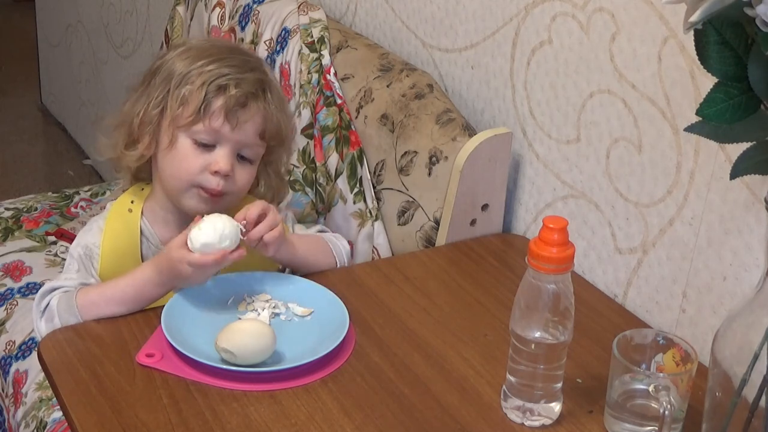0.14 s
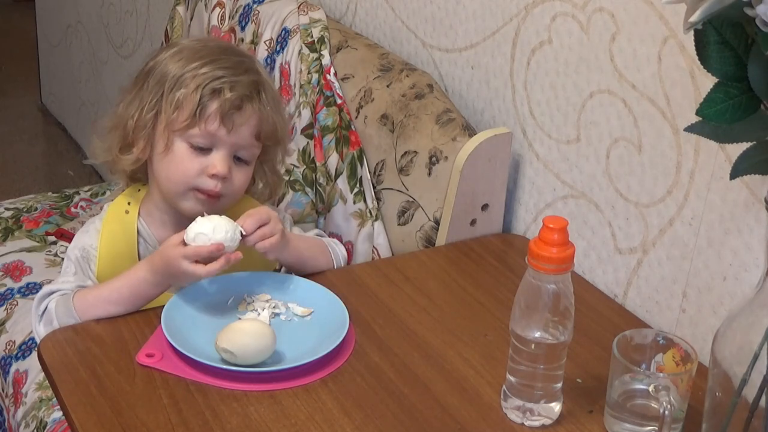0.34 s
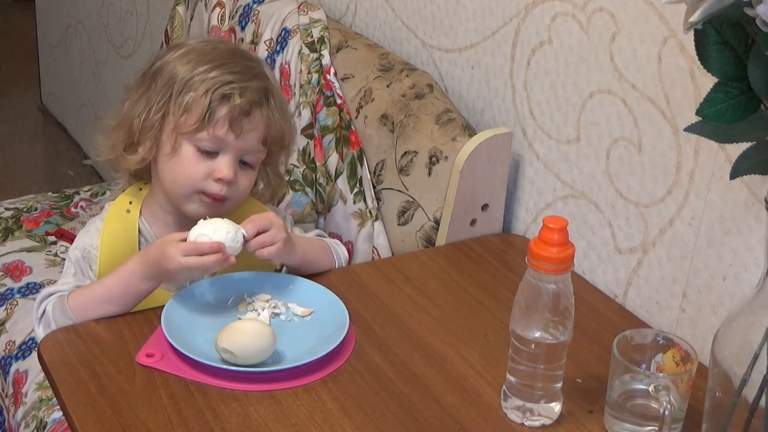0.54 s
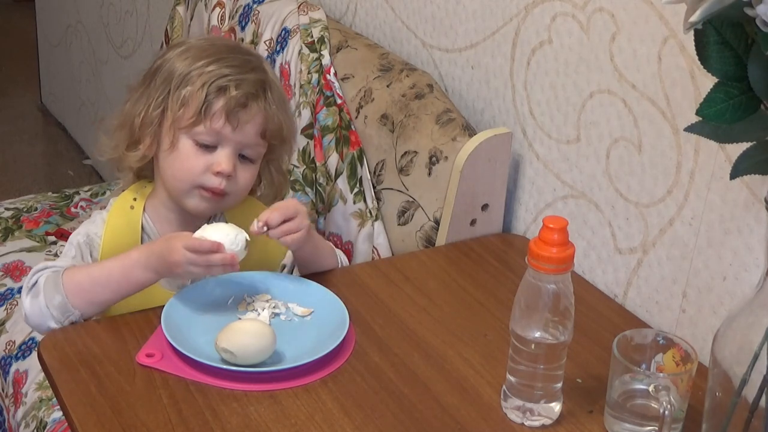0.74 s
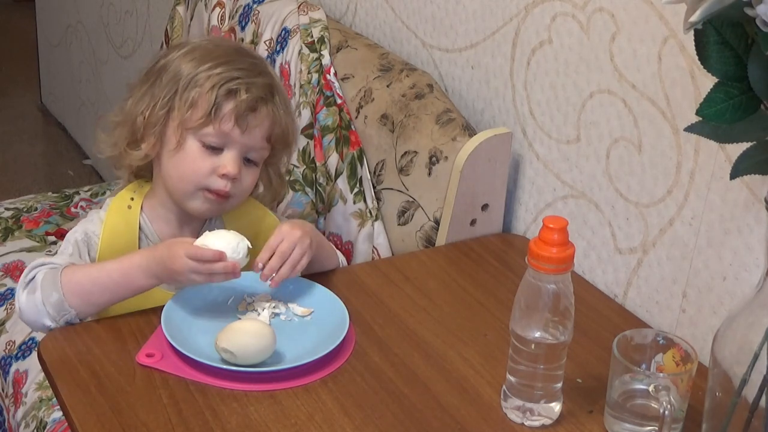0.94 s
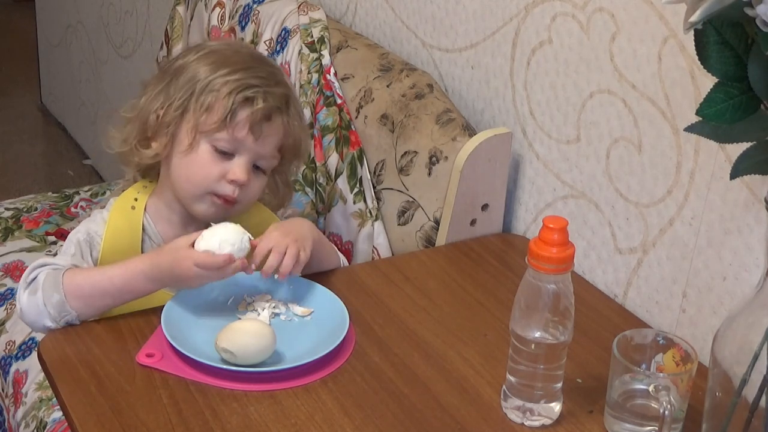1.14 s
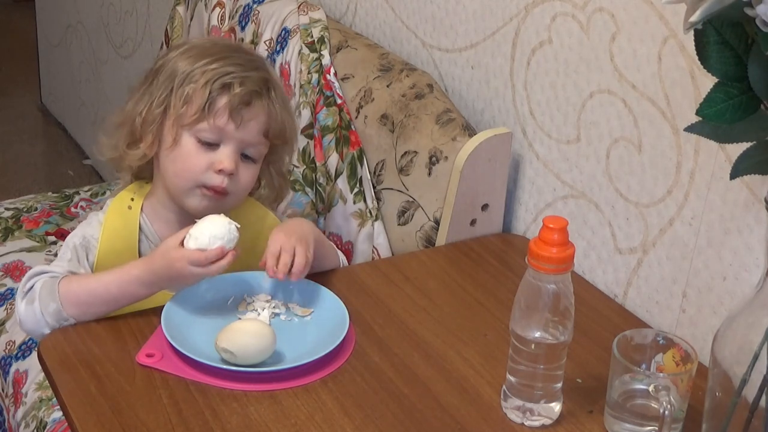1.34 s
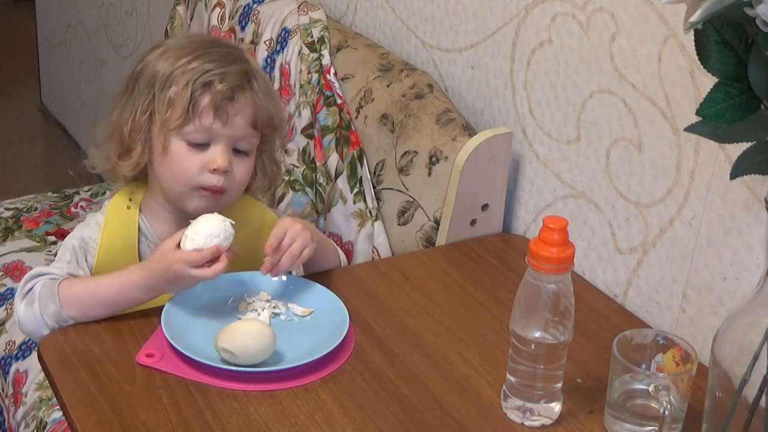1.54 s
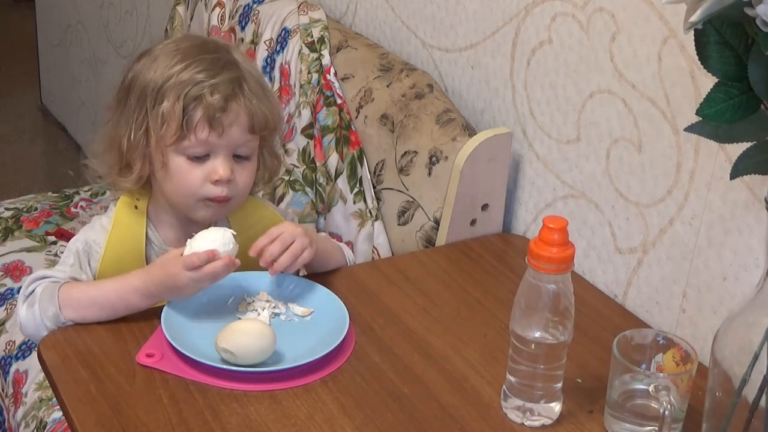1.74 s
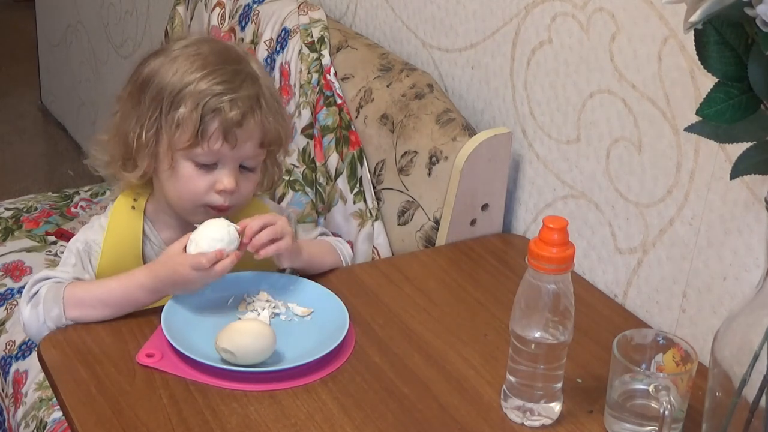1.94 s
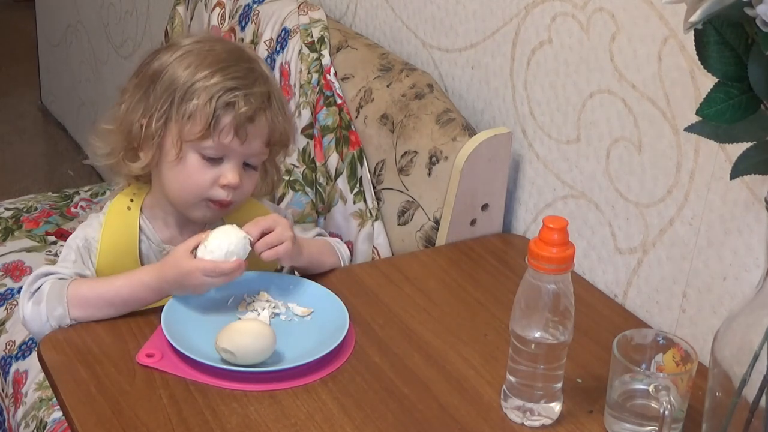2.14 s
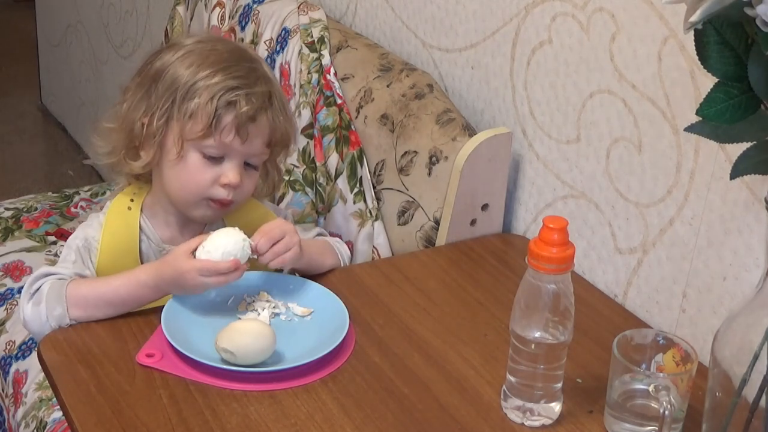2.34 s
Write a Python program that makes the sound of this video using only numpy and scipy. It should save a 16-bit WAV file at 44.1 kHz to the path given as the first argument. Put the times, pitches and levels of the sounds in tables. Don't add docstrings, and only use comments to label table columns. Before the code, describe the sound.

Crockery is set down on a table: faint touches at the start, a loud clattery knock at 0.2 s, a bright chink at 0.3, a second duller clack with cup ring at 0.43. Eggshell snaps sharply at 0.47, with tiny ticks near 0.63. A sleeve brushes at 0.88; fingers rub barely audibly around 1.45 and 2.07. Crisp shell clicks return at 2.29. Microphone hiss and thin, rapid camera chirping continue in a small room.

```python
import sys
import numpy as np
from scipy import signal
from scipy.fft import rfft, irfft
from scipy.io import wavfile
from scipy.ndimage import uniform_filter1d, minimum_filter1d

SR = 44100
rng = np.random.default_rng(int(sys.argv[2]) if len(sys.argv) > 2 else 0)


def log_audio(samples):
    frames = np.atleast_2d(samples).T
    limited = np.clip(frames, -1, 1)
    pcm = np.round(limited * 32767).astype(np.int16)
    wavfile.write(sys.argv[1], SR, pcm)


def undo_db(level):
    steps = np.asarray(level, float) / 20
    return 10 ** steps


N = 105840
TIME_S = np.arange(N) / SR
OPPOSED = np.array([[1], [-1]])


def curve(table, at, axis=1):
    rows = np.array(table, float)
    return np.interp(at, rows[:, 0], rows[:, axis])


def colour(x, table):
    hz = np.maximum(np.arange(len(x) // 2 + 1) * SR / len(x), 1)
    rows = np.array(table, float)
    level_db = np.interp(np.log(hz), np.log(rows[:, 0]), rows[:, 1])
    return irfft(rfft(x) * undo_db(level_db), len(x))


def unit(x):
    return x / np.sqrt(np.mean(x ** 2))


def decay(t, t60):
    return np.exp(-np.log(1000) * t / t60)


def ring(hz, t60, size=8192):
    t = np.arange(size) / SR
    return np.sin(2 * np.pi * hz * t) * decay(t, max(t60, 1e-4))


def add(out, at_s, x):
    i = int(at_s * SR)
    out[i:i + len(x)] += x[:len(out) - i]


def walk(rate):
    k = int(SR / rate)
    return unit(uniform_filter1d(uniform_filter1d(rng.standard_normal(N), k), k))


def strike(db, tilt_db, touch, pitches, modes, rattle):
    t = np.arange(8192) / SR
    out = np.zeros(len(t))
    for hz, (mode_db, t60) in zip(pitches, modes):
        chance = rng.standard_normal(65)
        level_db = db + mode_db + tilt_db * np.log2(hz / 4000) + 1.5 * chance[64]
        flutter = 1 + rattle * np.interp(t, np.arange(64) * 0.0025, chance[:64])
        out += undo_db(level_db) * ring(hz, t60) * flutter
    return out * (1 - np.exp(-t / touch * 2)) * 0.28


# (time [s], thud [dB], plate ring [dB], cup ring [dB], contact [s])
KNOCKS = [(.0100, -46, -53, -67, 0.0058), (0.0194, -59, -49, -43.5, 0.0079), (0.054, -48, -58, -38, 0.003),
          (.0700, -57, -62, -47.5, .004), (.1310, -73, -52.5, -64, 0.0065),
          (0.2206, -11.5, -17, -34, 0.0039), (.2330, -26.5, -19, -30, 0.007),
          (0.2748, -34, -36, -46, 0.0039), (0.3073, -37.5, -38, -63, 0.0099),
          (0.392, -50.5, -64, -47, 0.012), (.4255, -19, -49, -23, 0.0061), (.4350, -32, -53, -23, 0.0039),
          (0.452, -45.5, -55, -31.5, 0.0048)]
# (frequency [Hz], level [dB])
THUD = [(120, -68), (350, -36), (600, -11.5), (1400, -3.5), (2800, -7), (7000, -10), (15300, -17),
        (16300, -52)]
PLATE_HZ = [860, 1480, 1645, 1860, 4660, 5300, 6710, 7015, 7213, 8250, 8345, 10447, 10631, 14292, 14345,
            15364]
# (level [dB], decay t60 [s])
PLATE = [(-12.5, 0.15), (-1.5, 0.056), (-3.5, 0.073), (-5.5, 0.064), (-19, .09), (-6, 0.062), (-4.5, .12),
         (-3, 0.14), (-4, .1), (-5.5, .1), (-0.5, 0.098), (4.5, 0.13), (-5, 0.13), (0, 0.14), (-0.5, .1),
         (0, 0.11)]
CUP_HZ = [668, 1201, 1855, 2293, 2950, 4016, 4060, 5071, 5389, 6925, 7047, 10342, 10400, 14320, 15380]
# (level [dB], decay t60 [s])
CUP = [(-29.5, 0.26), (-10.5, 0.11), (-15, 0.1), (-17, .1), (-9.5, 0.046), (-2.5, 0.15), (-11, .1),
       (-11, 0.11), (-10, 0.055), (3.5, 0.091), (-9.5, 0.056), (6.5, 0.081), (-3, .06), (-6, .07),
       (-9, .07)]
# (time [s], level [dB], brightness [dB per octave], contact [s])
CHINKS = [
    (0.0118, -36, 1, .003),
    (0.022, -36.5, -0.5, .003),
    (.1280, -52, 8, .003),
    (.2960, -43, 5, .004),
    (.3085, -35, 8.5, 0.0033),
    (0.319, -49, 3, .003),
]
LID_HZ = [1150, 2480, 2790, 3050, 3350, 5500, 6700, 7100, 7800, 8230, 8810, 14400]
# (level [dB], decay t60 [s])
LID = [(-13.5, 0.14), (-4.5, 0.11), (-2.5, 0.042), (-5, 0.057), (-2, 0.056), (-14, .05), (-13, 0.11),
       (-2, .09), (-3.5, 0.09), (-6, .08), (-19, .06), (-15, .06)]


def crockery():
    thuds, rings = np.zeros(N), np.zeros(N)
    t = np.arange(2048) / SR
    for s, thud_db, plate_db, cup_db, touch in KNOCKS:
        rough = rng.standard_normal(2048) * t / touch * np.exp(1 - t / touch * 2)
        thud = unit(colour(np.roll(rough, 64), THUD))
        add(thuds, s, undo_db(thud_db) * thud * 0.2)
        add(rings, s, strike(plate_db, 0, touch, PLATE_HZ, PLATE, rattle=0.9))
        add(rings, s, strike(cup_db, 0, touch, CUP_HZ, CUP, rattle=0.3))
    for s, db, tilt_db, touch in CHINKS:
        add(rings, s, strike(db, tilt_db, touch, LID_HZ, LID, rattle=0.8))
    return thuds, rings


# (time [s], level [dB], pitch [Hz], ring [s])
SNAPS = [(0.4714, -19.5, 14500, 0.004), (0.4773, -34, 12800, .003), (.4850, -38, 13000, 0.0076),
         (.6125, -57, 14800, 0.0014), (0.614, -50, 13800, .001), (.6168, -44, 15100, 0.0027),
         (.6225, -40.5, 14500, 0.00086), (0.639, -35.5, 16000, 0.0011), (0.6477, -46.5, 15000, 0.001),
         (1.4090, -41, 14000, 0.00085), (2.2804, -47, 15000, 0.0011), (2.2835, -41, 13800, 0.0012),
         (2.2855, -29.5, 15400, 0.0013), (2.287, -42, 14100, 0.00092), (2.2933, -24.5, 15500, 0.0016),
         (2.2958, -33, 14800, 0.0015), (2.297, -43, 15000, 0.0041), (2.3015, -42, 13800, 0.0085),
         (2.3162, -38.5, 14300, 0.0043), (2.3200, -39, 15500, .002), (2.3247, -49, 15600, 0.006)]
PING_S = [.4716, .4716, .4716, 2.2935, 1.3200, 1.3690, 2.3790, 2.3700, 2.3850, .9440, .4830]
# (level [dB], pitch [Hz], ring [s])
PINGS = [(-28, 13150, .013), (-30.5, 11300, 0.0073), (-32, 15300, .012), (-48, 15600, .06),
         (-65.5, 693, 0.047), (-55, 1700, 0.0058), (-43, 1700, 0.0035), (-62, 1700, 0.012),
         (-61, 1660, 0.0093), (-60, 4300, 0.013), (-53, 13150, .09)]


def shell():
    out = np.zeros(N)
    t = np.arange(1024) / SR
    lead = 32
    for s, db, hz, t60 in SNAPS:
        burst = rng.standard_normal(len(t)) * decay(t, 2 * max(t60, 1e-4))
        body = [(1500, -40), (4800, -17)]
        crest = [(hz * 0.81, -7.5), (hz * 0.82, -2), (hz, 0), (hz + 900, -6), (hz + 1800, -25)]
        burst = colour(np.roll(burst, lead), body + crest)
        add(out, s - lead / SR, undo_db(db) * burst / np.abs(burst).max())
    for s, (db, hz, t60) in zip(PING_S, PINGS):
        ping = np.convolve(ring(hz, t60, size=2048), ring(hz, 0.0069, size=128))
        add(out, s, undo_db(db) * ping / 12)
    return out


def strokes(rows, tone, grain_db):
    shape = np.zeros(N)
    for start, peak, end, db in rows:
        phase = np.interp(TIME_S, [start, peak, end], [0, np.pi / 2, np.pi])
        shape += undo_db(db) * np.sin(phase)
    mid, side = (unit(colour(rng.standard_normal(N) * undo_db(grain_db * walk(600)), tone)) for _ in range(2))
    return shape * (mid + undo_db(-9.0) * side * OPPOSED)


# (start [s], peak [s], end [s], level [dB])
BRUSHES = [
    (.815, .885, 0.934, -53),
    (2.292, 2.297, 2.338, -63.5),
]
# (frequency [Hz], level [dB])
CLOTH = [(150, -53), (400, -26), (1140, -14), (1300, -3), (2480, -5), (15700, 0), (16200, -21)]


def sleeve():
    return strokes(BRUSHES, CLOTH, grain_db=0.74)


# (start [s], peak [s], end [s], level [dB])
RUBS = [(1.39, 1.445, 1.54, -69), (2.02, 2.07, 2.13, -64.5), (0.82, 0.67, 0.68, -73)]
# (frequency [Hz], level [dB])
SKIN = [(1200, -31), (2600, -4), (3600, -7.5), (5200, -7.5), (6500, -15), (10000, -13), (14000, -19)]


def fingers():
    return strokes(RUBS, SKIN, grain_db=1.5)


# (time [s], pitch [Hz], level [dB])
CHIRP = [(0, 9500, -55), (.11, 9500, -58.5), (.9, 9450, -61.5), (.95, 9550, -64.5), (1.15, 9500, -63),
         (1.153, 8200, -62), (1.222, 8200, -62), (1.225, 9500, -63.5), (1.3, 9320, -60.5),
         (1.42, 9050, -62.5), (1.6, 9230, -67), (1.72, 9040, -64), (1.82, 9800, -64), (1.823, 8270, -64),
         (2.4, 8240, -60.5)]
# (time [s], level [dB], pitch [Hz])
SKIPS = [
    (.916, -57, 7700),
    (1.43, -57.5, 7680),
    (1.573, -61, 7580),
]


def drive():
    out = np.zeros(N)
    t = np.arange(400) / SR
    turn_hz, first_s, rise_s = 70.065, 0.0030, 0.00091

    def beep(db, hz, fall_s):
        rise = np.minimum(t / rise_s, 1) ** 2
        fall = np.exp(-np.maximum(t - rise_s, 0) ** 2 / fall_s ** 2)
        return undo_db(db) * rise * fall * np.sin(2 * np.pi * hz * t)

    for s in np.arange(first_s, N / SR, 1 / turn_hz):
        chirp_chance, partner_chance, pitch_chance = rng.standard_normal(3)
        hz = curve(CHIRP, s) * (1 + 0.0033 * pitch_chance)
        db = curve(CHIRP, s, axis=2) + 2 * chirp_chance
        add(out, s, beep(db, hz, 0.0034))
        add(out, max(s - 0.001, 0), beep(-70 + 3 * partner_chance, 7780, 0.0041))
    for s, db, hz in SKIPS:
        add(out, s, beep(db, hz, 0.0057))
    return out


# (frequency [Hz], level [dB])
HISS = [(30, -26.5), (120, -23.5), (300, -18), (430, -6.5), (700, -4.5), (3500, -2), (8000, -5),
        (15600, -10)]
# (frequency [Hz], level [dB])
HISS_SIDE = [(60, -4), (200, -11), (400, -19), (700, -7.5), (1300, -3), (2400, -1), (8000, -1.5),
             (15000, -4.5)]
# (pitch [Hz], width [Hz], level [dB])
WHINE = [(2708, 60, -87), (3050, 120, -83), (3740, 60, -84), (4180, 80, -84), (4328, 80, -81),
         (4650, 100, -84), (10350, 200, -84), (13750, 200, -85)]
# (time [s], level [dB])
GAIN = [(0, 5), (.2, 3.5), (.4, 6), (.55, 3), (.8, 2), (1, 1), (2.4, 0)]


def background():
    mid, side = (colour(rng.standard_normal(N), HISS) for _ in range(2))
    hiss = undo_db(-66) * (mid + colour(side, HISS_SIDE) * OPPOSED) / np.std(mid)
    for hz, width, db in WHINE:
        band = [(hz - 6 * width, -60), (hz - width / 2, -3), (hz, 0),
                (hz + width / 2, -3), (hz + 6 * width, -60)]
        mid, side = (unit(colour(rng.standard_normal(N), band)) for _ in range(2))
        hiss = hiss + undo_db(db + 2.8 * walk(13)) * (mid + 0.25 * side * OPPOSED)
    return hiss * undo_db(curve(GAIN, TIME_S) + 0.5 * walk(8.9))


# (frequency [Hz], level [dB])
ROOM_SIDE = [(200, -23), (1200, -24), (2400, -10.5), (4400, -3.5), (8000, -5), (15000, -4.5)]


def room(x, wet_db):
    t = np.arange(SR // 2) / SR

    def tail(t60):
        return decay(t, t60) / np.sqrt(t60 * SR / (2 * np.log(1000)))

    onset = np.minimum(t / 0.00088, 1)
    shape = (tail(0.12) + undo_db(-33.5) * tail(0.32)) * onset
    mid, side = rng.standard_normal((2, len(t)))
    mid = signal.fftconvolve(x, mid * shape)[:N]
    side = signal.fftconvolve(x, colour(side, ROOM_SIDE) * shape)[:N]
    return x + undo_db(wet_db) * np.array([mid + side, mid - side])


def scene():
    thuds, rings = crockery()
    near = room(thuds, wet_db=3) / 2 + room(rings, wet_db=-3) + room(shell(), wet_db=-8)
    low_cut = signal.butter(4, 350, "high", fs=SR, output="sos")
    near = signal.sosfilt(low_cut, near)
    return near + sleeve() + fingers() + drive() + background()


def low_pass(x):
    return signal.sosfilt(signal.butter(12, 16970, fs=SR, output="sos"), x)


# (frequency [Hz], level [dB])
BAND_LIMIT = [(16800, 0), (17100, -50)]


def record(dry):
    hz = np.arange(N // 2 + 1) * SR / N
    dry = np.array([colour(port, BAND_LIMIT) for port in dry])
    top = irfft(rfft(dry) * np.clip((hz - 15720) / 120, 0, 1), N)
    hold = int(0.008 * SR)
    quiet = np.abs(top).max(axis=0) < undo_db(-49)
    shut = minimum_filter1d(1.0 * quiet, hold)
    mix = dry - top * uniform_filter1d(shut, hold // 2)
    return low_pass(mix)


dry = scene()
out = record(dry)
log_audio(out)
```